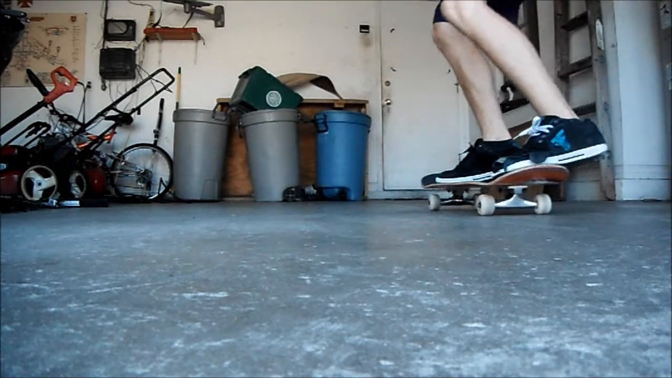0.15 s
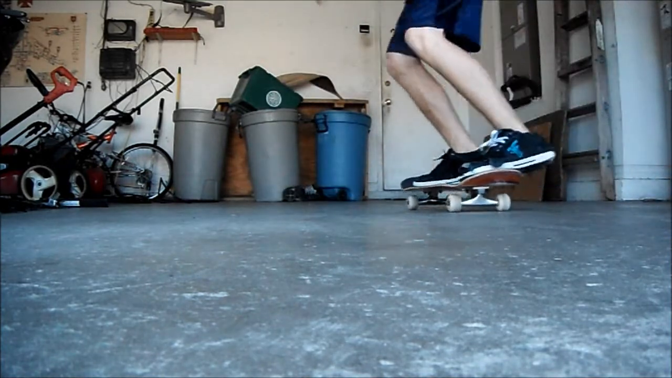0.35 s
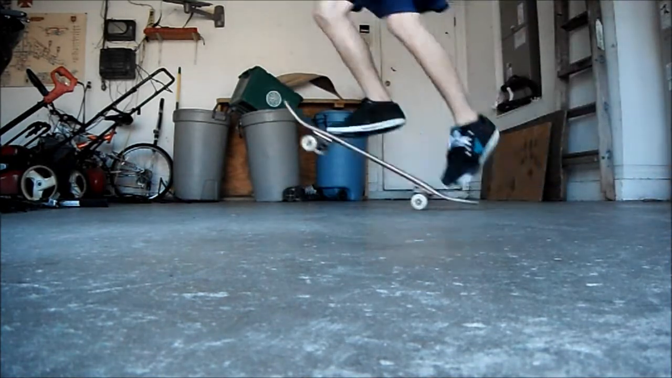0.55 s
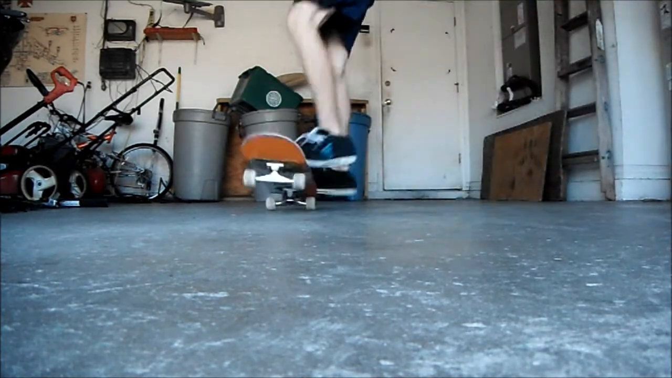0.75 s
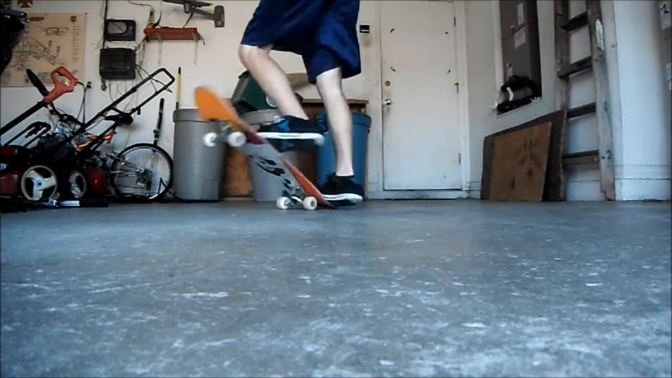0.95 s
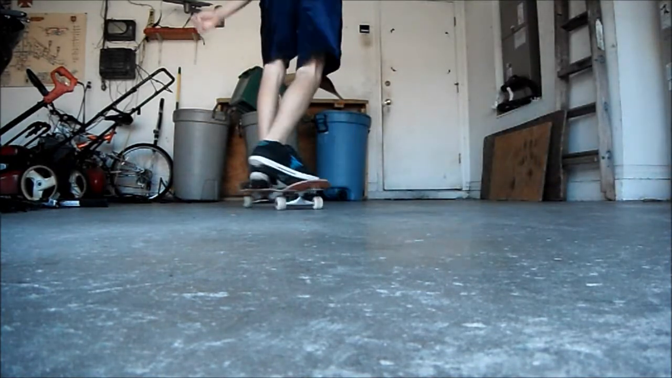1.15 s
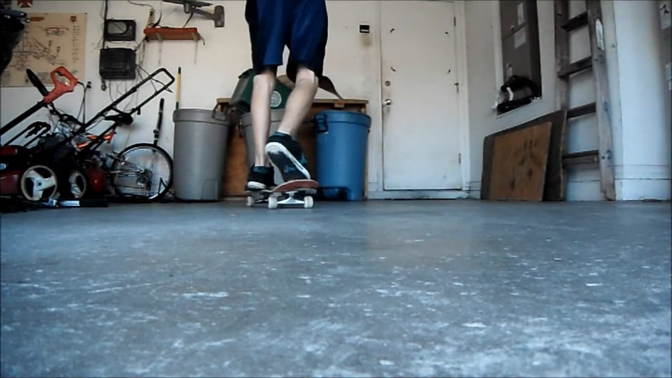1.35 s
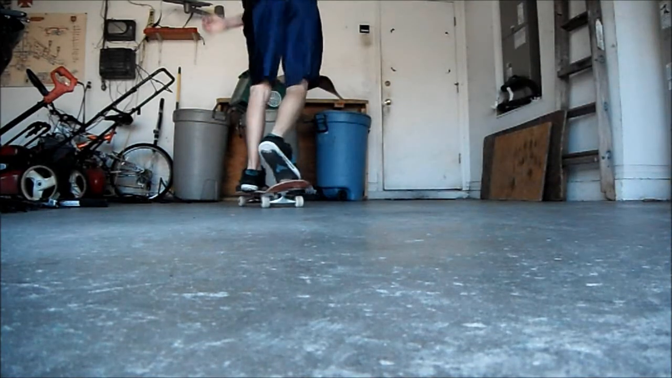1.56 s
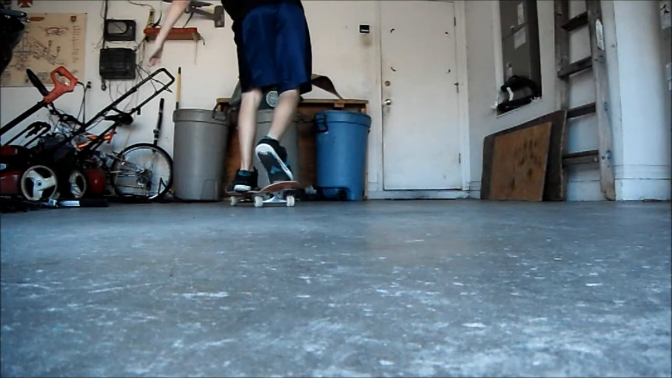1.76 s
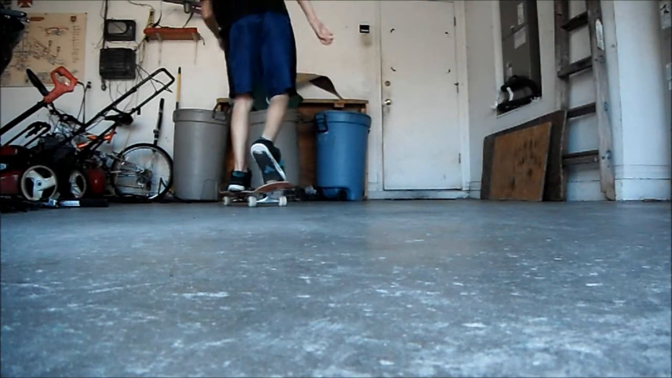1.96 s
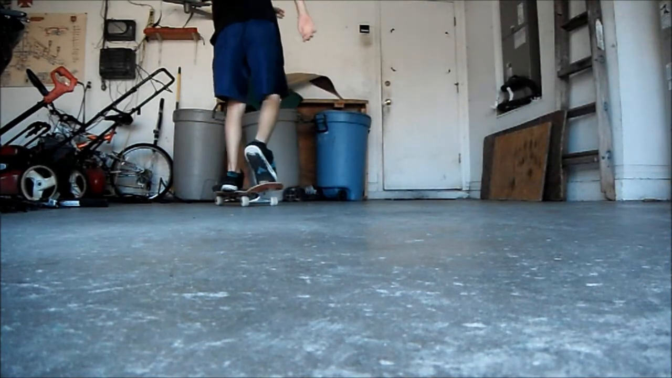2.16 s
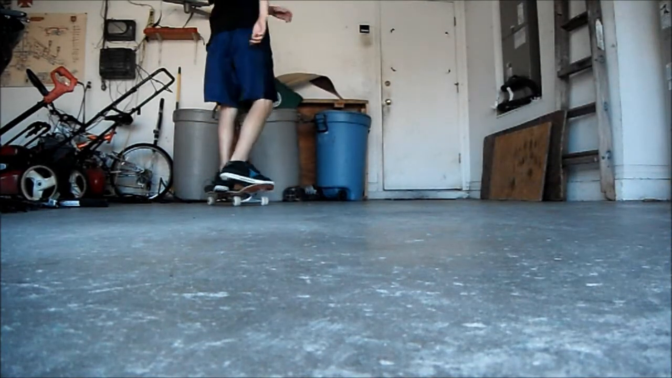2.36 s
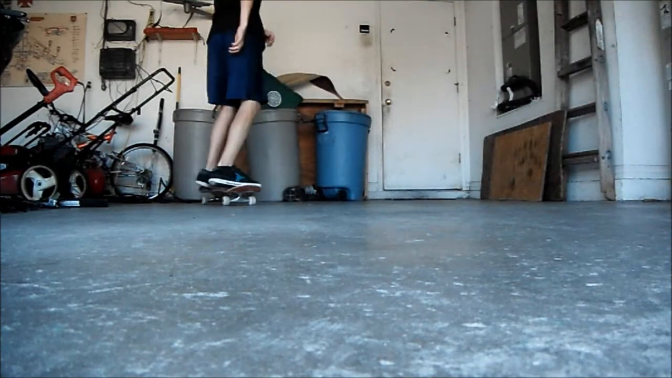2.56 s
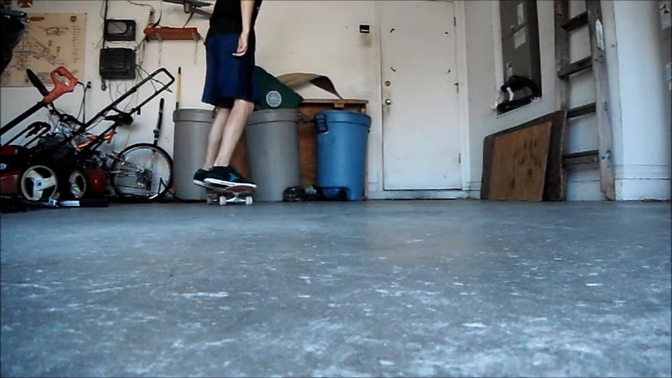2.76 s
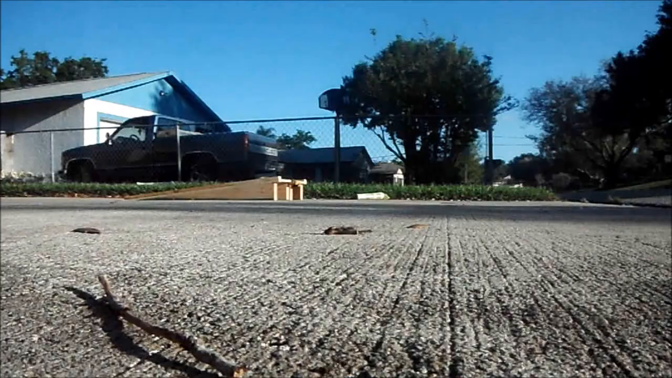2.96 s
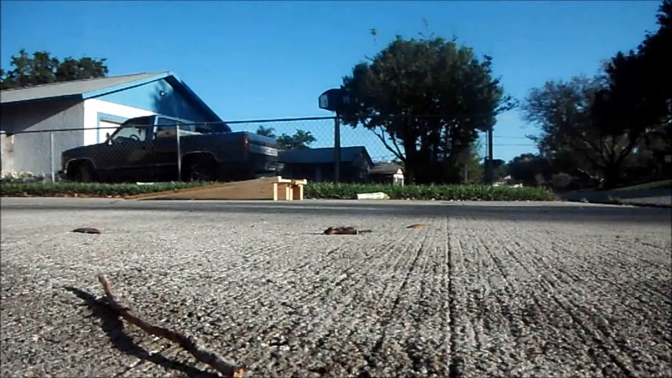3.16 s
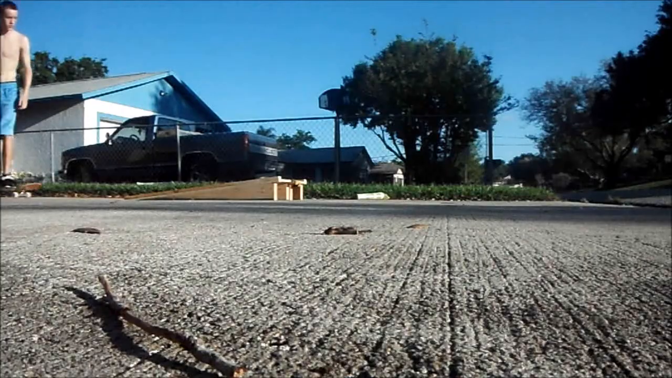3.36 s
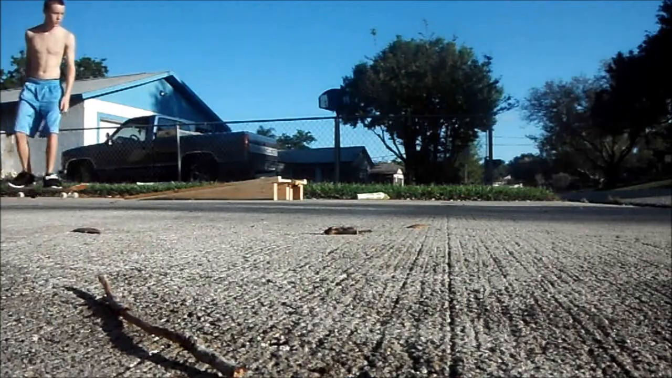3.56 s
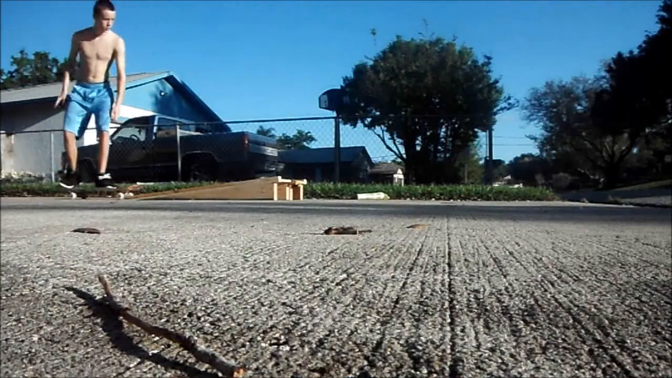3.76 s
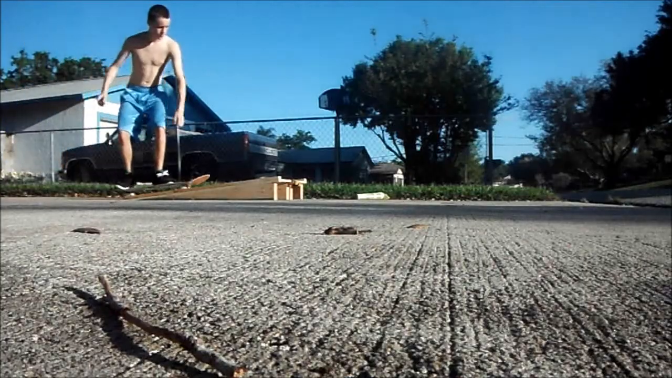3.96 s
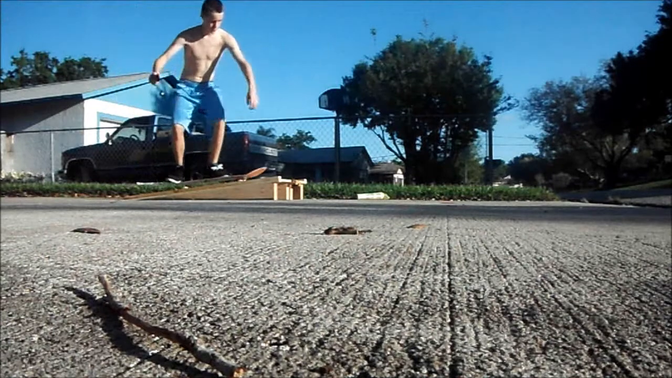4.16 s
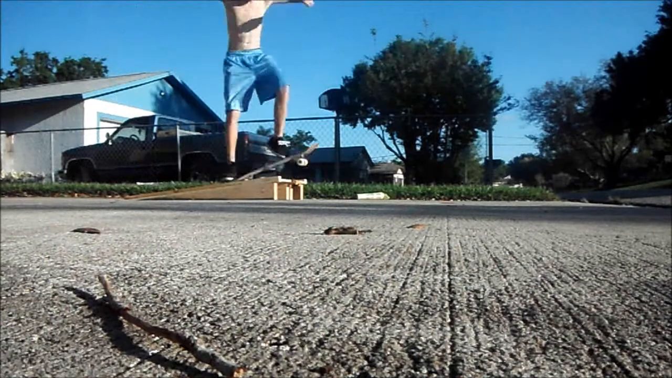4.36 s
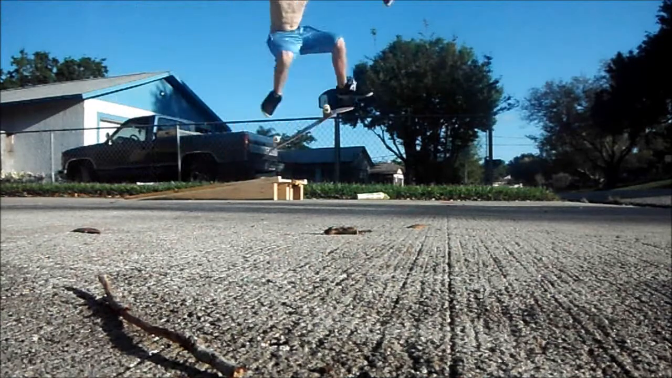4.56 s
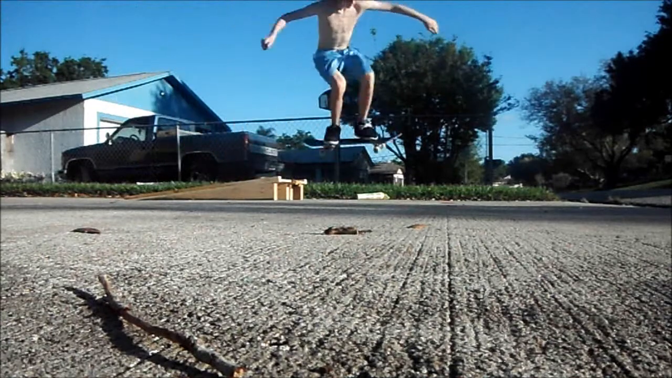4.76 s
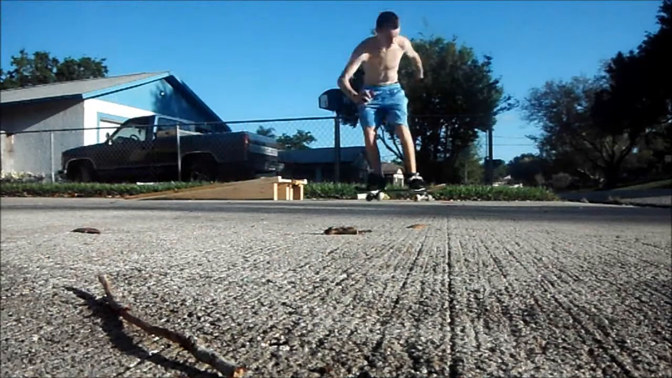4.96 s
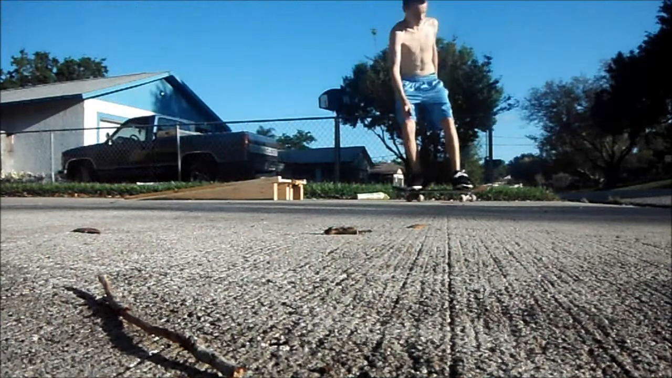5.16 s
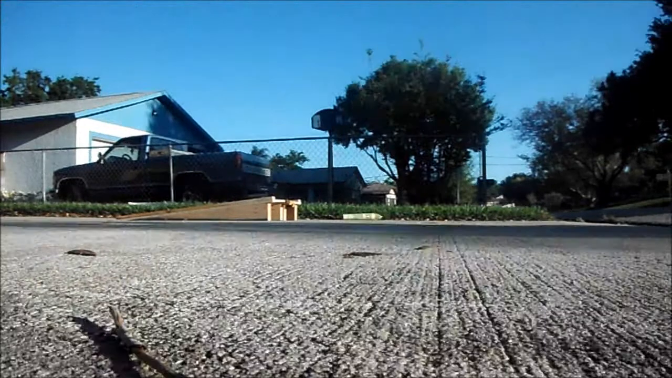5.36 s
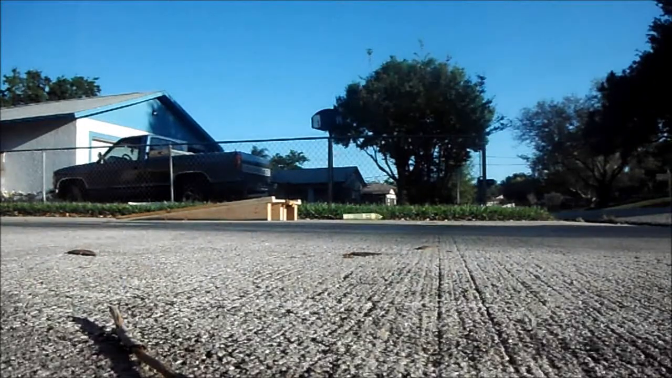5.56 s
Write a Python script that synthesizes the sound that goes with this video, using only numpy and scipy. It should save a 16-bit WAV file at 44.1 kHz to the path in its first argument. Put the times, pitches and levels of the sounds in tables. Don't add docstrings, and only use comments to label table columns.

```python
import sys
import numpy as np
from scipy import signal
from scipy.fft import rfft, irfft, next_fast_len
from scipy.io import wavfile
from scipy.ndimage import uniform_filter1d

SR = 44100
rng = np.random.default_rng(int(sys.argv[2]) if len(sys.argv) > 2 else 0)


def generate_wav(signal):
    frames = np.transpose(np.atleast_2d(signal))
    scaled = np.clip(frames, -1, 1) * 32767
    pcm = np.round(scaled).astype(np.int16)
    wavfile.write(sys.argv[1], SR, pcm)


def field_ratio(decibels):
    return 10 ** (np.asarray(decibels, dtype=float) / 20)


N = 246959

TAKE_EDGES = [0, 2.806, 5.248, 5.6]
# [t/s, f/Hz, level/dB, time to fall 60 dB/s, wobble 0-1]
FREE_RINGS = [(.62, 730, -34, .17, 0.3), (0.842, 233, -21, 0.27, 0.1), (0.831, 2500, -46, .2, .8),
              (1.235, 760, -22, 0.11, 0.5), (1.32, 719.5, -37, 1.8, 0.7), (2.7, 867, -26, 0.61, 0.75),
              (2.72, 1500, -26, 0.5, 0.9), (1.3, 2430, -44, .6, 0.56), (3.95, 202, -24, 0.55, 0.2),
              (3.9, 310, -4, 0.14, 0.1), (4.094, 184, -28, 0.3, 0.1), (4.425, 190, -28, 0.45, 0.1),
              (4.545, 207, -17.5, 0.22, 0.7), (1.835, 520, -24, 0.1, 0.8), (1.84, 1280, -30, 0.25, 0.86),
              (1.84, 883, -32, 0.41, 0.73), (4.932, 674, 1, 0.042, 0)]
# [t/s, f/Hz, level/dB, time to fall 60 dB/s]
DAMPED_PINGS = [(.7015, 1250, -14, .02), (.708, 2200, -9, 0.016), (.7435, 2120, -2, .02),
                (0.7895, 1450, -5, .03), (0.8182, 2340, -3, .02), (.816, 950, -7, 0.022),
                (.812, 226, -5, 0.06), (1.219, 200, -10, .06), (1.232, 300, -14, .1),
                (1.275, 240, -23, .15), (1.222, 600, -13, .06), (.573, 240, -21, .08),
                (.738, 205, -22, .07), (.848, 640, -22, .09), (4.918, 420, -9.5, .035),
                (4.931, 430, -12, .04), (4.945, 704, -19, 0.082), (.478, 700, -22, 0.043),
                (1.224, 880, -6, 0.045), (1.243, 806, -9, .04), (2.670, 2250, -5, .025),
                (2.671, 930, -5, 0.067), (2.686, 1750, -8, .03), (2.686, 790, -3, 0.054),
                (2.703, 1660, -9, .03), (2.714, 792, -9, .04), (2.738, 1400, -15, .05),
                (2.754, 640, -15, 0.052), (2.772, 810, -14, 0.08), (2.797, 807, -19, .06),
                (3.887, 517, -11, 0.055), (3.895, 518, 1.5, 0.061), (3.942, 330, -14, .04),
                (4.0595, 560, -13, 0.05), (4.059, 1250, -14, 0.025), (4.058, 198, -6, .11),
                (4.062, 371, -17, .1), (3.905, 196, -3, .1), (3.918, 470, -6, .07), (3.94, 200, -14, .04),
                (4.4875, 1950, -8, 0.022), (4.4875, 2850, -9, .02), (4.494, 228, -13, 0.05),
                (3.988, 310, -22, .1), (4.545, 260, -19.5, 0.076), (4.566, 327, -19, .05),
                (4.802, 500, -18, 0.042), (4.907, 565, -21, .04), (4.9195, 720, -2.5, 0.038),
                (4.930, 950, 0, 0.025)]


def evened(x):
    return x / np.sqrt(np.mean(x ** 2) + 1e-20)


def peaked(x):
    return x / np.sqrt(uniform_filter1d(x ** 2, size=130).max())


def read(points, hz):
    f, value = np.transpose(points)
    return np.interp(np.log(hz + 1), np.log(f + 1), value)


def columns(rows):
    s, *values = np.transpose(rows)
    t = np.arange(round(s[0] * SR), round(s[-1] * SR)) / SR
    return [t] + [np.interp(t, s, v) for v in values]


def add(mix, s, sound):
    part = mix[round(s * SR):][:len(sound)]
    part += sound[:len(part)]


def coloured(x, gain):
    size = next_fast_len(len(x))
    return irfft(rfft(x, size) * gain(np.fft.rfftfreq(size, 1 / SR)), size)[:len(x)]


def resonate(x, hz, width):
    turn = np.exp(2j * np.pi * np.cumsum(hz * np.ones(len(x))) / SR)
    r = np.exp(-np.pi * width / SR)
    return 2 * (turn * signal.lfilter([1 - r], [1, -r], x / turn)).real


def tone(rows, soft):
    t, hz, db = columns(rows)
    wave = np.sin(2 * np.pi * np.cumsum(hz) / SR)
    return t[0], np.sqrt(2) * field_ratio(db) * wave * signal.windows.tukey(len(t), soft)


def engine_hum():
    # [t/s, f/Hz, level/dB]
    engine = [
        (5.248, 97.5, -38),
        (5.274, 95, -44),
        (5.31, 93.5, -54),
        (5.392, 93, -38),
        (5.526, 92.5, -37),
        (5.6, 91, -36),
    ]
    return tone(engine, .05)


def bird():
    # [t/s, length/s, starting f/Hz, level/dB]
    pipes = [
        (3.542, 0.05, 2780, -41),
        (3.603, 0.042, 2710, -40),
        (3.657, 0.035, 2740, -54),
        (3.752, 0.04, 2720, -54),
    ]
    droop_hz_per_s = 1100
    out = np.zeros(N)
    for s, length, hz, db in pipes:
        add(out, *tone([(s, hz, db), (s + length, hz - droop_hz_per_s * length, db)], 0.26))
    return out


def humps(peaks, hz):
    return field_ratio(sum(db / (1 + (2 * (hz - centre_hz) / width) ** 2) for centre_hz, width, db in peaks))


def shifting(x):
    depth_db, fade_hz = 1.6, 1800
    hz, t, z = signal.stft(x, SR, nperseg=1024)
    patches = rng.standard_normal((len(t), len(hz)))
    patches = uniform_filter1d(patches, size=7, axis=0)
    patches = evened(uniform_filter1d(patches, size=3, axis=1)).T
    gain = field_ratio(depth_db * (patches - .3) / (1 + (hz[:, None] / fade_hz) ** 2)) - 1
    return signal.istft(z * gain, SR, nperseg=1024)[1][:len(x)]


def low(hz, edge_hz):
    return 1 / (1 + (hz / edge_hz) ** 6)


def wheels(rows, colour, drones, grit, air_db):
    t, *levels_db = columns(rows)
    lumpy_db, per_s, stones_db = grit
    drive, lumps, pick, size, air = rng.random((len(t), 5)).T
    drive = drive - .5
    lumps = evened(uniform_filter1d(uniform_filter1d(lumps - .5, 300), 300))
    stones = (pick < per_s / SR) * field_ratio(-4.0 * np.log(size + 0.016))
    stones = signal.oaconvolve(stones, np.exp(-np.arange(600) / 60.0))[:len(t)]
    stones = evened(stones)
    rumble = field_ratio(lumpy_db * lumps)
    drone = field_ratio(.6 * lumpy_db * lumps) + field_ratio(stones_db - 10.5) * stones
    hiss = field_ratio(.3 * lumpy_db * lumps) + field_ratio(stones_db) * stones
    bands = [lambda hz: low(hz, 855) * (1 - low(hz, 110)),
             lambda hz: low(hz, 2400) * (1 - low(hz, 1037)),
             lambda hz: 1 - low(hz, 3550)]
    out = field_ratio(air_db) * evened(coloured(air - .5, lambda hz: low(hz, 90) * hz / (hz + 15)))
    for level_db, band, bite in zip(levels_db, bands, [rumble, drone, hiss]):
        def gain(hz):
            return field_ratio(read(colour, hz)) * humps(drones, hz) * np.sqrt(band(hz))
        out += field_ratio(level_db) * evened(coloured(drive * bite, gain))
    return out + shifting(out)


def layers(rows, start, end, share, lift_db):
    s, load_db, grit_db = np.transpose(rows)[:, np.r_[0, :len(rows), -1]]
    s = np.clip(np.r_[start, s[1:-1], end], start, end)
    drone_db = (1 - share) * load_db + share * grit_db + lift_db
    return np.transpose([s, load_db, drone_db, grit_db])


def rolling():
    # [f/Hz, level/dB per Hz]
    garage_colour = [(59, -14.5), (100, 0), (177, -4), (210, -8), (244, 0), (471, -2), (751, -2.5),
                     (871, -9.5), (1150, -7), (2980, -19.5), (5640, -22.5), (15900, -37.5)]
    drive_colour = [(59, -22), (100, 3.5), (132, 7), (254, 1.5), (423, 3), (720, -5), (989, -10.5),
                    (1220, -8), (2740, -23), (4660, -26.5), (6270, -30.5), (7120, -31), (15900, -45)]
    last_colour = [(59, -31), (100, -1.5), (206, -6.5), (373, -6.5), (1030, -16.5), (1250, -13),
                   (2860, -27.5), (4280, -25), (5520, -28.5), (7270, -26), (15900, -39)]
    # [t/s, load on the wheels level/dB, grit under wheels and soles level/dB]
    garage_run = [(0, -34, -42), (.34, -38.5, -49), (.46, -26, -38), (.53, -35.5, -40.5), (.6, -37, -30.5),
                  (.68, -31, -35.5), (.86, -26, -38), (.9, -44, -48.5), (1.01, -43.5, -44),
                  (1.09, -52, -55), (1.4, -47, -55), (1.5, -49, -60), (1.69, -45, -54.5),
                  (2.05, -45.5, -57), (2.34, -45, -53.5), (2.55, -39, -44), (2.65, -46, -43),
                  (2.8, -38, -41)]
    drive_run = [(2.81, -32, -47), (3.11, -36.5, -48), (3.22, -33, -45), (3.62, -31, -47.5),
                 (3.875, -30, -51.5), (3.98, -28.5, -60.5), (4.148, -38.5, -65), (4.25, -36.5, -70),
                 (4.358, -25.5, -53), (4.47, -48.5, -54.5), (4.52, -32, -42), (4.614, -54, -58.5),
                 (4.76, -52, -62.5), (4.87, -57, -53), (4.97, -37, -49.5), (5.098, -47.5, -57),
                 (5.194, -44.5, -52), (5.24, -45, -52)]
    last_run = [(5.25, -32.5, -50.5), (5.36, -37, -50.5), (5.43, -33, -47.5), (5.49, -36, -39),
                (5.52, -35, -47), (5.6, -29.5, -49)]
    # [f/Hz, width/Hz, level/dB]
    deck_drones = [
        [(190, 39, 12), (364, 37, -1.5), (730, 70, 3), (1200, 84, -0.5)],
        [(135, 13, 4.5), (300, 14, 4.5), (388, 110, 6), (447, 74, -0.5), (1320, 170, 0.5), (4100, 430, 2),
         (7350, 600, 3.5), (10000, 600, 4.5)],
        [(172, 30, -2), (395, 60, 6), (520, 24, 4), (1250, 74, -1.5), (4300, 600, 1.5), (7340, 590, 3)],
    ]
    # [lumpiness/dB, stones per second, stones level/dB]
    ground = [
        (1.3, 160, -15.5),
        (2.9, 40, -18),
        (1.5, 60, -15),
    ]
    # [share of grit 0-1, lift/dB]
    drone_mix = [
        (1, 3.5),
        (0.64, 1.5),
        (0.9, 6),
    ]
    air_levels = [-51, -52.5, -50.5]
    colours = [garage_colour, drive_colour, last_colour]
    runs = [garage_run, drive_run, last_run]
    out = np.zeros(N)
    for k in range(3):
        levels = layers(runs[k], TAKE_EDGES[k], TAKE_EDGES[k + 1], *drone_mix[k])
        add(out, TAKE_EDGES[k], wheels(levels, colours[k], deck_drones[k], ground[k], air_levels[k]))
    return out


def scuff(rows, width):
    t, db, hz = columns(rows)
    rasp = resonate(resonate(rng.standard_normal(len(t)), hz, width), hz, width)
    return t[0], field_ratio(db) * evened(rasp) * signal.windows.tukey(len(t), .3)


def scuffs():
    # [t/s, level/dB, centre f/Hz]
    rubbing_strokes = [
        [(2.47, -48, 4720), (2.554, -32.5, 4650), (2.655, -40, 5100)],
        [(4.505, -49, 3900), (4.533, -41.5, 3890), (4.561, -52, 3870), (4.575, -36, 3850)],
        [(3.888, -34, 7500), (3.898, -21, 8000), (3.93, -38, 7000)],
    ]
    out = np.zeros(N)
    for rows in rubbing_strokes:
        add(out, *scuff(rows, 3000))
    return out


def bushing_squeak():
    # [t/s, level/dB, f/Hz]
    squeak = [
        (4.235, -47.5, 1000),
        (4.275, -41.5, 1150),
        (4.3, -44, 1600),
        (4.32, -43, 1880),
        (4.345, -50, 2000),
    ]
    return scuff(squeak, 600)


def axle_squeal():
    # [t/s, f/Hz, level/dB]
    squeal = [
        (.8065, 2400, -12),
        (.810, 2400, 1.5),
        (.8165, 2360, 0.5),
    ]
    return tone(squeal, 0.3)


def deck_sway():
    # [t/s, f/Hz, level/dB]
    sway = [
        (1.252, 730, -21),
        (1.275, 715, -23),
        (1.293, 706, -21.5),
        (1.305, 716, -25),
    ]
    return tone(sway, .2)


def pings(rows):
    out, t = np.zeros(N), np.arange(SR // 8) / SR
    for s, hz, db, t60 in rows:
        add(out, s, field_ratio(db - 60 * t / t60) * np.sin(2 * np.pi * hz * t) * np.minimum(t / 0.0015, 1))
    return out


def low_kicks():
    # [t/s, f/Hz, level/dB, time to fall 60 dB/s]
    kicks = [
        (3.893, 60, -24, .08),
        (4.917, 75, -20, 0.08),
        (4.1, 70, -33, .06),
    ]
    return pings(kicks)


def free_rings(rows):
    out, t = np.zeros(N), np.arange(SR // 2) / SR
    for s, hz, db, t60, wobble in rows:
        width = 25 + 70 * wobble
        noise = rng.standard_normal(len(t))
        wavering = evened(resonate(resonate(noise, hz, width), hz, width))
        sound = np.sqrt(1 - wobble) * np.sin(2 * np.pi * hz * t) + 0.82 * wobble * wavering
        add(out, s, field_ratio(db - 60 * t / t60) * sound * np.minimum(t / 0.0041, 1))
    return out


def ring(modes):
    t = np.arange(SR // 3) / SR
    out = sum(field_ratio(db - 60 * t / t60) * np.sin(2 * np.pi * hz * t) for hz, db, t60 in modes)
    return out / np.linalg.norm(out)


def listed(kinds):
    return sorted((s, db, db + thump_db, db + crack_db, hz, rise, length, tick, tilt_db)
                  for rows, rise, length, tick, crack_db, tilt_db in kinds
                  for s, db, thump_db, hz in rows)


def blows(kinds, thump, deck, ring_db, ring_t60):
    # [f/Hz, level/dB per Hz]
    crack_colour = [(1500, -24), (2400, -3), (3200, 0), (5000, -2), (7500, -5), (10500, -9), (13000, -14),
                    (16000, -19)]
    t, out = np.arange(4000) / SR, np.zeros(N)
    thump_ring, deck_ring = ring(thump), ring(deck)
    above = signal.butter(2, 480, "high", fs=SR, output="sos")
    for s, deck_db, thump_db, crack_db, hz, rise, length, tick, tilt_db in listed(kinds):
        noise = rng.standard_normal(len(t))
        contact = noise * np.exp(-(t / length) ** 1.28) * np.minimum(t / rise, 1)
        first_tick = tick * (t == 0)
        struck = deck_ring + field_ratio(ring_db) * ring([(hz, 0, ring_t60)])
        clack = signal.oaconvolve(contact + 1.5 * first_tick, struck[:3000])
        add(out, s, field_ratio(deck_db - 3) * peaked(signal.sosfilt(above, clack)))
        add(out, s, field_ratio(thump_db - 3) * peaked(signal.oaconvolve(contact, thump_ring)))
        crack = coloured(np.r_[np.zeros(64), contact + first_tick],
                         lambda hz: field_ratio(read(crack_colour, hz) + tilt_db * np.log2(hz / 5000 + .1)))
        add(out, s - 64 / SR, field_ratio(crack_db - 1.5) * peaked(crack))
    return out


def walls(x, decays, first_s):
    taps = np.zeros((3, SR // 2))
    at = np.arange(round(first_s * SR), taps.shape[1] - 10, 10)
    places = at + rng.integers(0, 10, (3, len(at)))
    np.put_along_axis(taps, places, rng.choice([-1., 1.], (3, len(at))), 1)
    hz, t, z = signal.stft(taps, SR, nperseg=256)
    tails = signal.istft(z * field_ratio(-60 * t / read(decays, hz)[:, None]), SR, nperseg=256)[1]
    turn = np.pi * (np.arange(N) * 40 / SR + np.arange(3)[:, None] / 3)
    fed = np.sqrt(2 / 3) * np.cos(turn) * x
    return signal.oaconvolve(fed, tails / np.linalg.norm(tails[0]), axes=1).sum(0)[:N]


def garage_board():
    # [f/Hz, level/dB, time to fall 60 dB/s]
    thump = [(190, -17, .06), (234.4, 19.5, 0.1), (336, 9, 0.12), (445, 6, .05)]
    deck = [(616, -28, 0.024), (840, -7, 0.019), (1000, -14, 0.0061), (1300, 8.5, 0.012),
            (1735, 16.5, 0.003), (2210, 12, 0.0028), (2500, 14, 0.0011)]
    edge_taps = [
        (.472, -15, -22, 1500),
        (.979, -20.5, -34, 1140),
    ]
    truck_ticks = [(.735, -11.5, -20, 1900), (.7395, -11, -18, 2200), (.7435, -5.5, -37.5, 2170),
                   (.751, -10, -20.5, 1500), (.771, -14, -17.5, 1900), (.780, -12.5, -35.5, 2000),
                   (.785, -14, -30, 2600), (.789, -13.5, -22, 1510), (.800, -10, -19, 2500),
                   (.807, -1, -12.5, 1900), (.811, -3, -18, 1500), (.577, -20.5, -10, 2000),
                   (.605, -16.5, -15, 2100), (.617, -16.5, -15, 1300), (.698, -18, -20, 2400),
                   (1.692, -40.5, -3, 2500), (1.830, -22.5, -18, 2600), (2.665, -9.5, -21, 1540),
                   (2.742, -20.5, -20, 1500), (2.758, -26, -20, 2600)]
    knocks = [
        (.685, -23, -14, 900),
        (.7, -14, -22, 1200),
        (.727, -20, -18, 950),
        (.797, -11.5, -18, 2450),
        (.816, -3, -24, 870),
        (2.668, -3.5, -14, 1550),
        (2.677, -6, -17, 1770),
        (2.699, -8, -26, 1500),
        (2.735, -24, -30, 1600),
    ]
    slaps = [
        (.827, -13, -18, 700),
        (1.2185, 2, -22, 940),
        (1.230, -6, -26, 705),
        (2.686, -2.5, -23.5, 884),
        (2.712, -12.5, -40, 860),
    ]
    slides = [
        (.478, -16.5, -11, 780),
        (.578, -16.5, -4, 1140),
        (.604, -15, -20, 720),
        (.984, -32.5, -17.5, 1120),
        (1.834, -24, -16, 1250),
        (2.36, -35.5, -12, 1480),
    ]
    # [f/Hz, time to fall 60 dB/s]
    wall_tone = [(200, -1), (350, -2.5), (750, -1.5), (1600, -3), (2500, -3), (6000, -3)]
    wall_decay = [(150, 0.072), (400, 0.53), (1040, 0.46), (2760, 0.46), (7280, 0.26)]
    # rows, rise s, contact s, first tick size, crack over strength dB, crack tilt dB per octave
    kinds = [(edge_taps, 0.00046, 0.0044, 5.4, 1.7, -8),
             (truck_ticks, 0.00062, 0.0039, 1.4, -6, -.1),
             (knocks, 0.0014, 0.0097, .3, -7, -0.12),
             (slaps, 0.00025, 0.018, 1.3, -8, -0.075),
             (slides, 0.001, 0.067, 0.077, -12, -0.39)]
    board = blows(kinds, thump, deck, 0.65, 0.0073)
    board += free_rings([row for row in FREE_RINGS if row[0] < TAKE_EDGES[1]])
    board += pings([row for row in DAMPED_PINGS if row[0] < TAKE_EDGES[1]])
    returned = coloured(board, lambda hz: field_ratio(read(wall_tone, hz)))
    return board + field_ratio(-11.5) * walls(returned, wall_decay, .004)


def drive_board():
    # [f/Hz, level/dB, time to fall 60 dB/s]
    thump = [(175, -7, 0.13), (219, 7, 0.035), (312.7, -1.5, 0.089), (382, -36.5, 0.024), (454, 2, 0.043)]
    deck = [(650, 12, 0.009), (860, -7, 0.0081), (1130, 6.5, 0.012), (1350, 14.5, 0.0029),
            (1720, 11.5, 0.0025), (2070, 15, 0.0035), (2600, 19.5, 0.00082)]
    bump_clicks = [(3.05, -37, -20, 1300), (3.222, -38, -20, 2300), (3.338, -41, -20, 2000),
                   (3.375, -32, -20, 1900), (3.411, -30, -20, 2380), (3.427, -29, -10, 1900),
                   (3.447, -36, -20, 1800), (3.495, -37, -18, 2000), (3.530, -38, -20, 2500),
                   (3.596, -37, -10, 2000), (3.685, -39, -20, 2500), (3.765, -36, -20, 2500),
                   (3.928, -29, -20, 2200), (5.028, -42, -20, 2000), (5.186, -39, -20, 2000),
                   (5.244, -37, -20, 1700), (5.334, -45, -20, 2500), (5.443, -33, -20, 2000),
                   (5.462, -39, -20, 2500), (5.492, -37, -20, 2500)]
    bumps = [(3.043, -29.5, 1.5, 1320), (3.146, -30, 3, 1400), (3.21, -24, -16, 640),
             (3.359, -26.5, -19, 1620), (3.411, -17, -5, 686), (3.428, -22.5, -3, 1300),
             (3.496, -29, -4, 1060), (3.598, -27.5, 5.5, 1250), (3.763, -30.5, -4, 620),
             (3.833, -36, 0, 1500), (3.885, -27, 2.5, 630), (4.194, -47, 1, 633), (4.312, -43, 20.5, 604),
             (5.12, -40, -4, 1400), (5.178, -31, -5, 774), (5.443, -28, -2, 1210), (5.473, -30, 0, 1250)]
    thuds = [
        (3.532, -26.5, 1, 1280),
        (3.907, -6, -6, 930),
        (4.274, -43, 17.5, 1100),
        (4.544, -31, 12.4, 750),
        (4.568, -30.5, 6.5, 759),
        (3.918, -19, 4, 500),
        (4.905, -27, 8.4, 560),
    ]
    snaps = [
        (4.359, -26, 8, 1050),
        (4.386, -26.5, 7, 760),
        (4.8005, -19, -1, 1700),
        (3.942, -32, 11, 600),
        (4.937, -5.5, -14.5, 690),
    ]
    tail_pops = [
        (4.4872, -8.5, -12, 1900),
        (4.8235, -12, -16, 1600),
    ]
    slams = [
        (3.891, -1.5, -17.5, 533),
        (3.896, 4, -14, 500),
        (3.928, -22, 6.5, 789),
        (4.921, -11, -4, 705),
        (4.495, -19.5, -3, 1210),
        (4.916, 0, -12, 730),
        (4.929, -3, -14, 930),
    ]
    scuffles = [
        (4.24, -40, 14.5, 1160),
        (4.3, -37, 9, 810),
        (4.34, -33.5, -3, 760),
        (4.69, -37.5, -4, 1110),
        (4.845, -33, -11, 1300),
    ]
    hop = [
        (4.059, -9.5, -9, 1650),
    ]
    grains = [(4.057, -34, -11, 900), (4.930, -14, -20, 1700), (4.8255, -28, -20, 2500),
              (4.852, -40, -20, 1500), (4.872, -44, -20, 2000), (4.904, -39, -20, 2000),
              (4.9395, -13.5, -20, 1400), (4.962, -39, -20, 2500), (5.222, -43, -20, 2500),
              (4.572, -42, -20, 2000)]
    skids = [(4.803, -20.5, -5, 1560), (4.829, -25, -12, 1600), (4.492, -24, -5, 1460),
             (4.865, -34, -12, 1600), (4.98, -37, -8, 700), (5.015, -37, -7, 900), (4.51, -30, -7, 1400)]
    # [f/Hz, time to fall 60 dB/s]
    yard_decay = [(150, 0.066), (400, 0.036), (1040, 0.064), (2760, 0.04), (7280, 0.03)]
    # rows, rise s, contact s, first tick size, crack over strength dB, crack tilt dB per octave
    kinds = [(bump_clicks, .001, 0.0038, .5, -1.5, -.3),
             (bumps, 0.0054, .018, 0.0995, -10, -.1),
             (thuds, 0.0057, 0.011, .1, -22, -.1),
             (snaps, 0.001, 0.0053, .6, -7.5, -.1),
             (tail_pops, 0.0011, 0.0058, 5.3, -4.5, -6.5),
             (slams, 0.0026, 0.0065, .3, -14, -0.46),
             (scuffles, 0.017, 0.066, 0.03, -15.5, -7),
             (hop, 0.0021, 0.0072, .5, -13.5, -4.5),
             (grains, .0004, 0.0023, 1.2, 1.2, .4),
             (skids, .0015, 0.021, .2, -10, -1.5)]
    board = blows(kinds, thump, deck, -3.0, 0.011)
    board += free_rings([row for row in FREE_RINGS if row[0] > TAKE_EDGES[1]])
    board += pings([row for row in DAMPED_PINGS if row[0] > TAKE_EDGES[1]])
    return board + field_ratio(-21) * walls(board, yard_decay, 0.0048)


def scene():
    indoors = np.arange(N) < TAKE_EDGES[1] * SR
    board = np.where(indoors, garage_board(), drive_board())
    no_bass = signal.butter(3, 120, "high", fs=SR, output="sos")
    mix = signal.sosfilt(no_bass, board)
    mix += bird() + rolling() + scuffs() + low_kicks()
    for s, sound in [engine_hum(), bushing_squeak(), axle_squeal(), deck_sway()]:
        add(mix, s, sound)
    return mix[None]


def top_cut(x):
    return signal.sosfilt(signal.butter(12, 16090, fs=SR, output="sos"), x)


def record(dry):
    hiss_db, edge_hz, overload = -51, 16050, 1.0
    duck_from_db, recover_db_per_s = -33, 31.5
    power_db = 10 * np.log10(abs(uniform_filter1d(dry[0] ** 2, size=400)) + 1e-12)
    fall = np.arange(N) * recover_db_per_s / SR
    held_db = np.maximum.accumulate(power_db + fall) - fall
    over_db = np.maximum(held_db - duck_from_db, 0)
    hiss = evened(coloured(rng.standard_normal(N), lambda hz: 1 / (1 + hz / 6000)))
    heard = dry[0] + field_ratio(hiss_db - over_db) * hiss
    limited = coloured(heard, lambda hz: 1 / (1 + (hz / edge_hz) ** 60))[None]
    clipped = limited / (1 + abs(limited / overload) ** 8) ** (1 / 8)
    return top_cut(clipped)


dry = scene()
out = record(dry)
generate_wav(out)
```